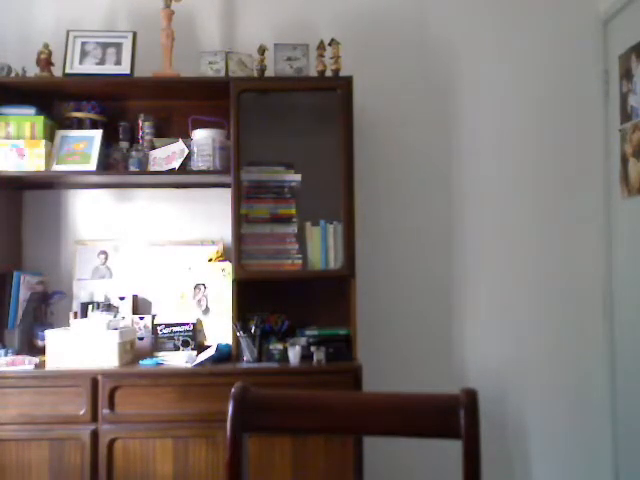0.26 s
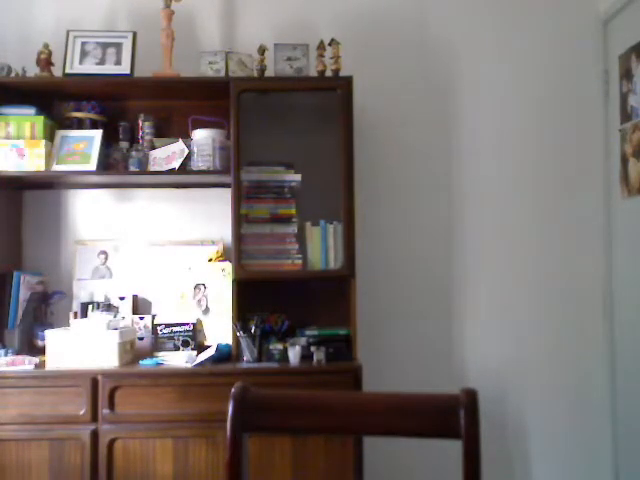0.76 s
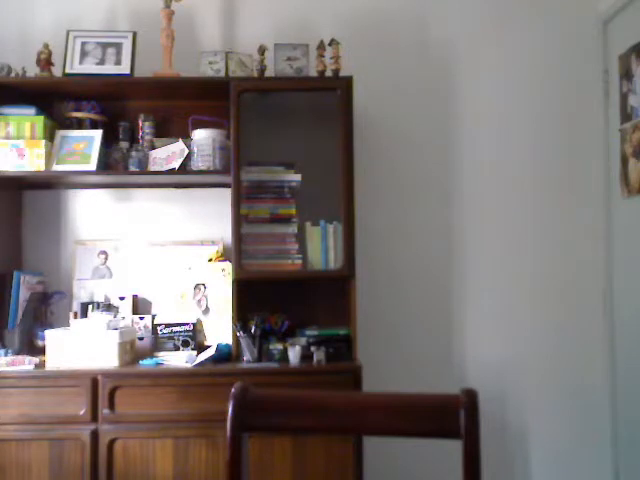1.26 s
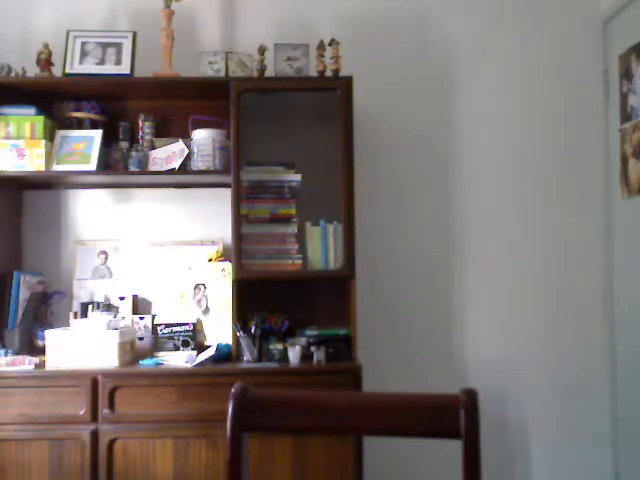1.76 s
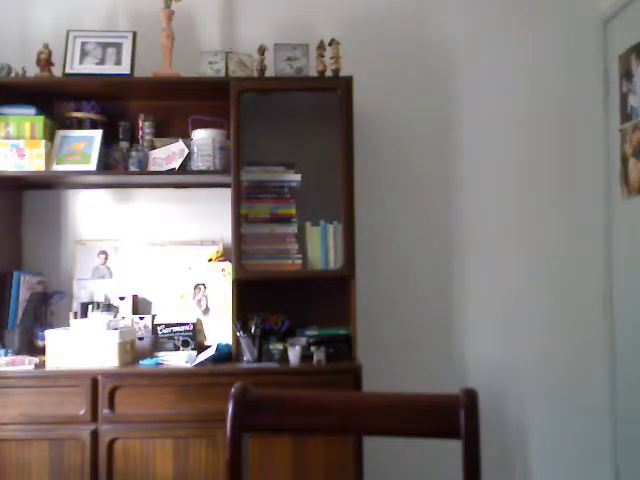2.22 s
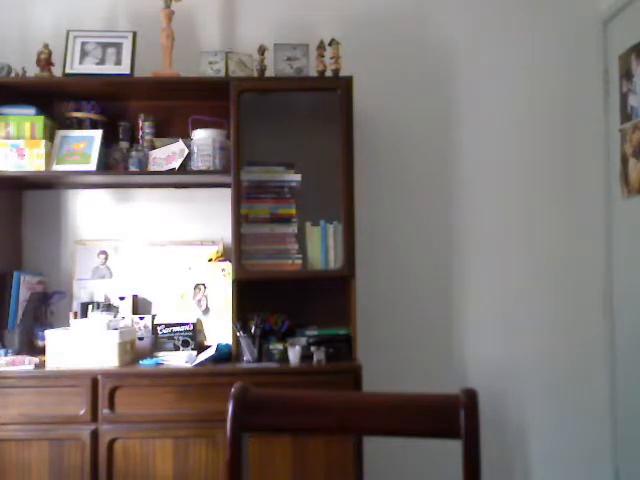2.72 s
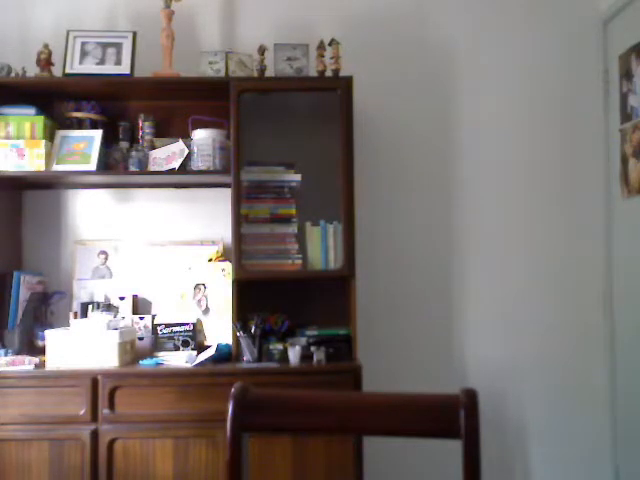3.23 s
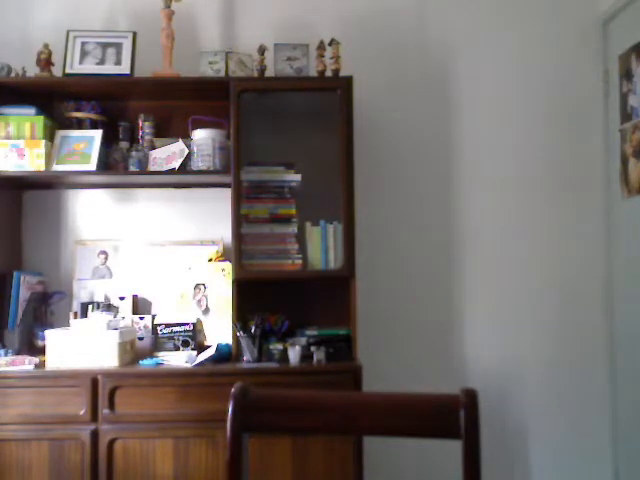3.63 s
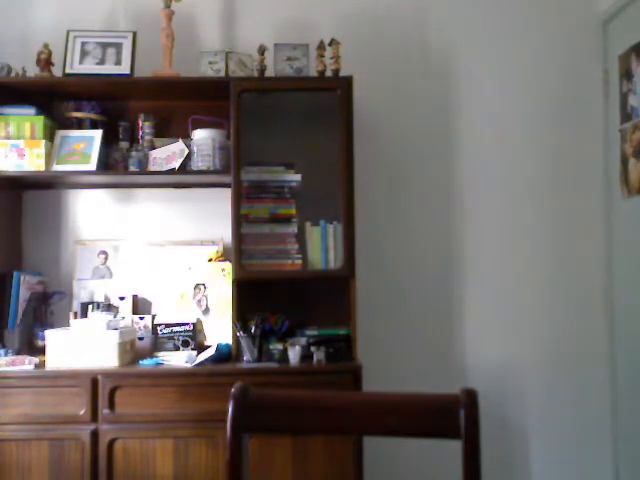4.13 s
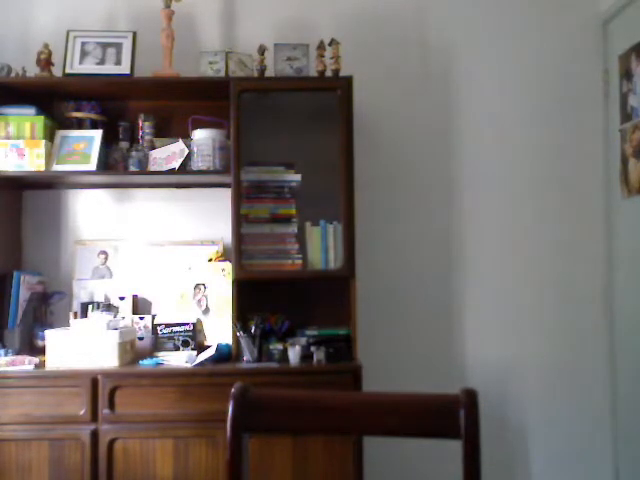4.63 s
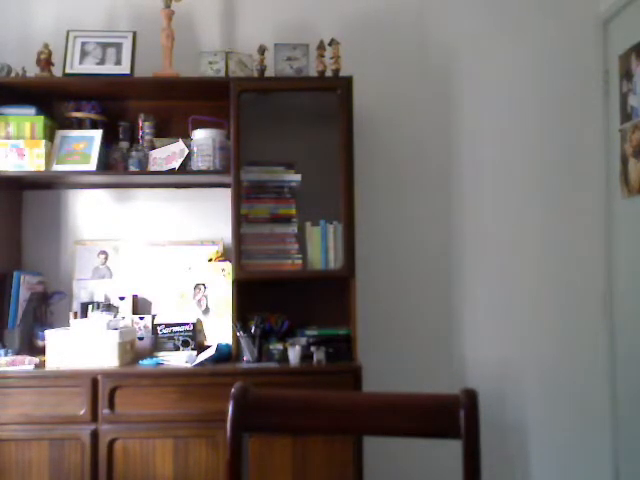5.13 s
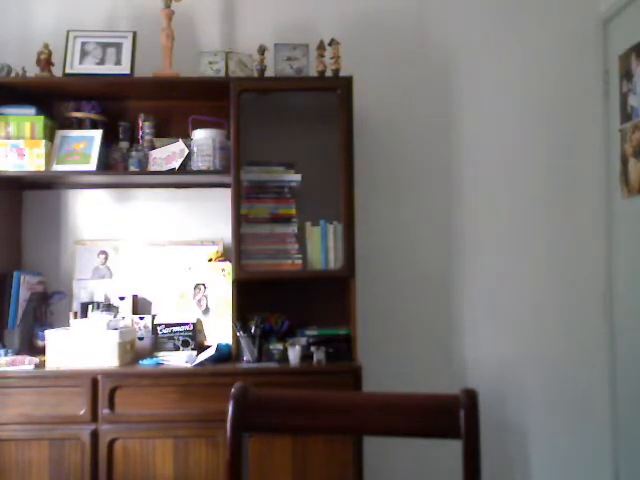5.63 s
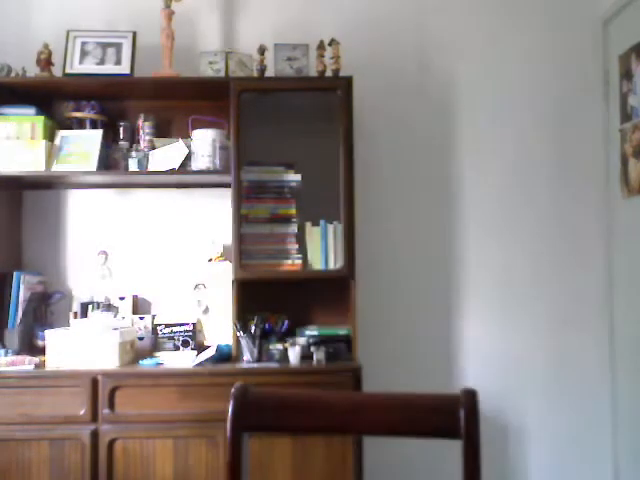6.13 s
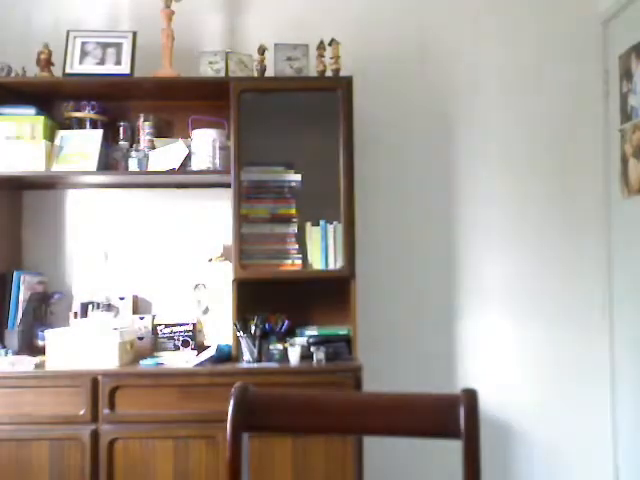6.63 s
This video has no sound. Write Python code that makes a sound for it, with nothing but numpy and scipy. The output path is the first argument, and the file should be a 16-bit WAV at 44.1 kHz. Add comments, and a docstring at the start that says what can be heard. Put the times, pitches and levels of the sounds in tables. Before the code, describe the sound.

Brief curtain-ring scrapes and clacks over a faint wavering hum, a woody rail knock, then crowded louder pulls that rattle and settle.

```python
"""Curtains are drawn open in a small quiet room, where an appliance hum swells and fades throughout.
At first cloth swishes softly; near 1.2 s and 2.7 s short pulls scrape the rings along the rail and clack them.
Loose rings tinkle and padded thuds follow; at 4.6 s the rail jolts with a woody knock.
From 5.3 s the pulls crowd together, loudest after 5.8 s, and the last rings tinkle as the cloth settles.
Noise and impulses drive the resonances of rail, rings and cloth, and the walls smear those contacts."""
import sys
import numpy as np
from scipy import signal
from scipy.fft import rfft, irfft, next_fast_len
from scipy.io import wavfile
from scipy.ndimage import uniform_filter1d, map_coordinates

SR = 44100
rng = np.random.default_rng(int(sys.argv[2]) if len(sys.argv) > 2 else 0)


def output_pcm(signal):
    """Save a mono or channel-first signal as 16-bit PCM at the path in sys.argv[1].

    Samples are clipped to [-1, 1] before scaling.
    """
    pcm = np.clip(np.atleast_2d(signal).T, -1, 1) * 32767
    wavfile.write(sys.argv[1], SR, np.round(pcm).astype(np.int16))


N = 302784
SIZE = 32768  # samples in the working window of one event
# until the weight bears on the rail (a time constant): less boom, more clack, less treble
LOAD_S, SLACK_BOOM_DB, SLACK_CLACK_DB, SLACK_TREBLE_DB = 0.011, -10.5, 0.5, -3.5


def amp(db):
    """Decibels to gain."""
    return 10 ** (np.asarray(db) / 20)


def unit(x):
    """Scale to rms 1."""
    return x / np.sqrt(np.mean(x ** 2) + 1e-20)


def along(points, hz):
    """(Hz, value) points read on a log frequency axis."""
    f, v = np.transpose(points)
    return np.interp(np.log(hz + 1), np.log(f), v)


def bell(hz, centre, width):
    """Resonance curve: 1 at its centre, one half at half a width to either side."""
    return 1 / (1 + (2 * (hz - centre) / width) ** 2)


def modes(hz, table):
    """Response of a set of (Hz, width, dB) modes, summed in power."""
    return np.sqrt(sum((amp(db) * bell(hz, f, w)) ** 2 for f, w, db in table))


def add(track, s, sound):
    """Mix a sound into the track at time s."""
    start = max(round(s * SR), 0)
    track[start:start + len(sound)] += sound[:N - start]


def axes():
    """Time and frequency axes of one event."""
    return np.arange(SIZE) / SR, np.fft.rfftfreq(SIZE, 1 / SR)


def wobble(t, rate):
    """A smooth random curve, rate knots a second."""
    return map_coordinates(rng.standard_normal(SIZE), [t * rate])


def room():
    """Diffuse answer of the room from one spot: a short build-up, then a decay, even in colour."""
    # how long the walls hold each band: (f/Hz, t60/s)
    decay_times = [(150, 0.34), (400, 0.23), (1000, 0.14), (2800, 0.16), (7000, 0.17), (15000, 0.22)]
    hz, t, z = signal.stft(rng.standard_normal(SIZE), SR, nperseg=256)
    decay = amp(-60 * t / along(decay_times, hz)[:, None])
    tail = signal.istft(z * decay, SR, nperseg=256)[1][:SIZE]
    build_up = 1 - np.exp(-np.arange(SIZE) / SR / 0.0006)
    tail = unit(tail * build_up) / np.sqrt(SIZE)
    tail[0] += 0.3  # the direct path to the microphone
    response = rfft(tail)
    colour = np.sqrt(np.abs(uniform_filter1d(np.abs(response) ** 2, size=101)))
    return response / colour


def heard(force, gain):
    """A force rings a body of the given frequency response, which sounds into the room."""
    # folding the cepstrum gives minimum phase: the body answers only after the blow
    cepstrum = irfft(np.log(np.maximum(unit(gain), 1e-6)))
    cepstrum[1:SIZE // 2] *= 2
    cepstrum[SIZE // 2 + 1:] = 0
    body = np.exp(rfft(cepstrum))
    return irfft(rfft(force) * body * room())[:SIZE * 3 // 4]


def contacts(envelope, rate, rub, seconds):
    """Tiny random impacts over smooth rubbing, with the energy of so many seconds at rms 1."""
    slips = (rng.random(SIZE) < rate / SR) * rng.standard_normal(SIZE)
    force = envelope * (unit(slips) + rub * rng.standard_normal(SIZE))
    return unit(force) * np.sqrt(seconds * SR / SIZE)


def background():
    """An appliance hums with a wandering level over faint steady tones and the noise of the room."""
    # course of the hum at the microphone: (t/s, level/dB)
    hum_levels = [(0.0, -64.5), (0.27, -70.5), (0.43, -60.5), (0.61, -72), (1.07, -59.5), (1.54, -75),
                  (1.79, -68.5), (2.16, -64.5), (2.35, -71), (2.57, -67), (3.53, -68.5), (3.73, -72.3),
                  (4.27, -62.5), (4.72, -75), (4.8, -68), (5.29, -63.5), (6.69, -62), (6.86, -64.5)]
    # steady tones: (f/Hz, level/dB)
    whine_tones = [(48, -93), (100, -89), (237, -82), (1281, -81), (7316, -107), (8000, -104)]
    # colour of the room noise: (f/Hz, relative level/dB per Hz)
    air_colour = [(25, -44), (45, -23), (110, -20), (140, -9.5), (235, -8.5), (380, -19.5), (760, -18.5),
                  (1050, -20.5), (1300, -19), (1500, -23), (4200, -33.5), (6000, -37), (7500, -50),
                  (15000, -48)]
    t = np.arange(N) / SR

    def tone(hz, drift):
        """A sine of rms 1 whose pitch wanders by about drift Hz."""
        pitch_hz = hz + drift * wobble(t, 4.7)
        return np.sqrt(2) * np.sin(2 * np.pi * np.cumsum(pitch_hz) / SR)

    hum_db = np.interp(t, *np.transpose(hum_levels)) + 0.7 * wobble(t, 8)
    hum = amp(hum_db) * tone(143.7, drift=0.96)
    whine = sum(amp(db) * tone(hz, drift=min(0.006 * hz, 8)) for hz, db in whine_tones)
    air_gain = amp(along(air_colour, np.fft.rfftfreq(N, 1 / SR)))
    air = unit(irfft(rfft(rng.standard_normal(N)) * air_gain, N))
    return hum + whine + amp(-67.5) * air


def stirs():
    """The hanging cloth stirs faintly at random: rows with the same columns as the swishes."""
    per_s, length_s, mean_db, middle_hz = 1.0, 0.019, -77.5, 5130
    rows = []
    for when, force, fold in rng.random((round(per_s * N / SR), 3)):
        level_db = mean_db + 6 * (force - 0.5)
        centre_hz = middle_hz * 1.04 ** (fold - 0.5)
        rows.append((when * N / SR, length_s, level_db, centre_hz))
    return rows


def swishes():
    """Folds of cloth brush past each other with a soft narrow hiss."""
    # strokes of the cloth: (t/s, length/s, level/dB, centre f/Hz)
    strokes = [(0.006, 0.028, -70, 4500), (0.462, 0.044, -74.5, 4830), (0.771, 0.0071, -63, 4900),
               (0.986, 0.03, -57.5, 4370), (1.146, 0.015, -49.5, 4000), (2.054, 0.008, -63.5, 3100),
               (2.37, 0.019, -65, 3200), (3.253, 0.012, -69, 3700), (4.032, 0.074, -71.5, 5100),
               (6.053, 0.053, -65, 5130), (6.359, 0.028, -46.5, 5370), (6.547, 0.075, -59, 4930),
               (6.705, 0.044, -63.5, 5200)]
    track, (t, hz) = np.zeros(N), axes()
    for s, length, db, centre_hz in strokes + stirs():
        stroke = np.sqrt(np.abs(np.sin(np.pi * np.minimum(t / length, 1))))
        cloth = bell(hz, centre_hz, 0.7 * centre_hz) / (1 + (hz / 6800) ** 14)
        brushing = contacts(stroke, rate=3600, rub=1.0, seconds=length)
        add(track, s, amp(db) * heard(brushing, cloth))
    return track


def bumps():
    """Cushioned knocks of the rail and its fittings excite only a low band."""
    # soft knocks: (t/s, level/dB, f/Hz)
    knocks = [(0.769, -55.5, 560), (0.802, -55.5, 281), (1.63, -40, 750), (2.823, -39, 700),
              (3.54, -56, 284), (3.693, -65.5, 950), (3.694, -63, 302), (4.66, -52.5, 602),
              (4.932, -60.5, 265), (5.342, -48, 250), (5.851, -39.5, 230), (6.196, -38, 137)]
    track, (t, hz) = np.zeros(N), axes()
    blow = np.sqrt(0.03 * SR) * (t == 0)  # the energy of 30 ms at rms 1
    for s, db, pitch_hz in knocks:
        add(track, s, amp(db) * heard(blow, bell(hz, pitch_hz, 0.65 * pitch_hz) ** 3))
    return track


def rail(hz, boom_db, clack_db, treble_db, slack=0):
    """Heavy contact wakes the rail's low modes, a free ring clacks, a hard contact is bright."""
    # broad colour of rings on the rail: (f/Hz, relative level/dB per Hz)
    rail_colour = [(40, -44.5), (100, -14.5), (220, -9), (420, 1), (700, 2.5), (1150, 2.5), (1450, 0.5),
                   (2200, -1.5), (3800, -1.5), (5900, -6.5), (6700, -17), (7600, -27.5), (11000, -35),
                   (15000, -41)]
    # their resonances, as peaks or dips in that colour: (f/Hz, width/Hz, level/dB)
    resonances = [(217.7, 54, 13.5), (309.6, 96, 11), (387.6, 44, -14), (568, 160, 3), (888, 30, 1.5),
                  (1203, 91, -7.5), (1593, 220, 5), (1970, 35, 2), (2856, 130, 5.5), (3440, 82, 0.5),
                  (4300, 230, -1.5), (13200, 1800, 3)]
    boom_db = boom_db + SLACK_BOOM_DB * slack
    clack_db = clack_db + SLACK_CLACK_DB * slack
    treble_db = treble_db + SLACK_TREBLE_DB * slack
    detune = 1 + 0.026 * rng.standard_normal(len(resonances))  # no two contacts ring quite alike
    peaks_db = sum(db * bell(hz, f * d, w) for (f, w, db), d in zip(resonances, detune))
    low = 1 / (1 + (hz / 1020) ** 8)
    high = 1 - 1 / (1 + (hz / 2900) ** 4)
    contact_db = boom_db * low + clack_db * bell(hz, 1680, 750) + treble_db * high
    return amp(along(rail_colour, hz) + peaks_db + contact_db)


def clack(spread, gain):
    """Several rings hit each other within a few milliseconds."""
    t, hz = axes()
    burst = np.exp(-t / spread) - np.exp(-5 * t / spread)
    return heard(contacts(burst, rate=1100, rub=0.24, seconds=0.02), gain)


def drag(push, span, boom_db, clack_db, treble_db, fizz_db, count):
    """Rings chatter past count spots of the rail in small slips; rubbing adds a fine fizz on top."""
    sound, (t, hz) = 0, axes()
    fizz = amp(fizz_db * hz ** 8 / (hz ** 8 + 10000.0 ** 8))
    for at in np.arange(count) * span / count:
        # neighbouring spots crossfade at constant power
        part = push * np.sqrt(np.clip(1 - np.abs(t - at) * count / span, 0, 1))
        body = rail(hz, boom_db, clack_db, treble_db, slack=np.exp(-at / LOAD_S))
        chatter = contacts(part, rate=640, rub=0.28, seconds=np.sum(part ** 2) / SR)
        sound = sound + heard(chatter, fizz * body)
    return sound


def pulls():
    """Each pull jerks the slack rings, drags them unevenly along the rail and lets them run out."""
    # pulls on the curtain: (t/s, length/s, level at the end of the pull/dB, swell over the pull/dB,
    # run-out t60/s, rail boom/dB, ring clack/dB, treble/dB, rubbing fizz/dB)
    pull_rows = [(1.147, 0.01, -51.5, -1, 0.067, -16, 19, -5, 0),
                 (1.257, 0.058, -45, -1.5, 0.099, 8.5, 15.5, 17, 3),
                 (2.695, 0.11, -40, 0, 0.09, -6, 7.5, 6, 1),
                 (2.812, .105, -36, -0.5, .07, 1.5, 5.5, 8.5, 10),
                 (5.311, 0.019, -37.5, 5.5, 0.103, 7, 8, 13, 0),
                 (5.44, 0.017, -39, 1.5, 0.18, 8, 7, 12.5, 1),
                 (5.586, 0.012, -30, 4, 0.14, 5.5, -3, 4, -0.5),
                 (5.78, 0.06, -27, 0.5, 0.052, -2.5, -0.5, -0.5, 7),
                 (5.835, 0.032, -19, 1.5, 0.24, -1, 1.5, 1, 4.5),
                 (6.095, 0.031, -30, -1.5, 0.055, -5, -2.5, -8, 1),
                 (6.138, 0.15, -23, -0.5, 0.22, -4, 2, 3, 5)]
    attack_s, surge_db, surges_per_s = 0.0018, 2, 74.5
    jerk_db, jerk_spread_s = -3, 0.0043  # clack of the slack rings, against the pull's first level
    track, (t, hz) = np.zeros(N), axes()
    for s, length, db, swell_db, run_out, boom_db, clack_db, treble_db, fizz_db in pull_rows:
        swell = swell_db * np.minimum(t / length - 1, 0)
        fall = 60 * np.maximum(t - length, 0) / run_out
        surge = surge_db * wobble(t, surges_per_s)
        push = amp(swell - fall + surge) * (1 - np.exp(-t / attack_s))
        span = length + 0.74 * run_out
        add(track, s, amp(db) * drag(push, span, boom_db, clack_db, treble_db, fizz_db, count=9))
        slack_rings = rail(hz, boom_db, clack_db, treble_db, slack=1)
        add(track, s, amp(db - swell_db + jerk_db) * clack(jerk_spread_s, slack_rings))
    return track


def clacks():
    """Moving rings run into the ones ahead."""
    # collisions: (t/s, level/dB, spread/s, rail boom/dB, treble/dB)
    collisions = [(1.307, -33, 0.006, -13, -10), (1.613, -29.5, 0.0094, -2.5, 6.5),
                  (1.622, -35, 0.021, -0.5, 10), (2.81, -25, 0.0062, -8.5, 1.5),
                  (2.896, -44.5, 0.006, 6, 19.5), (6.126, -26, 0.003, -10.5, -4.5),
                  (6.14, -23, 0.0023, -9, -2.5), (6.239, -21, 0.012, -0.5, 4), (6.286, -27, .003, 0, 7),
                  (6.565, -53, 0.0031, -17, 18)]
    track, (t, hz) = np.zeros(N), axes()
    for s, db, spread, boom_db, treble_db in collisions:
        rings = rail(hz, boom_db, clack_db=0.5, treble_db=treble_db)
        add(track, s, amp(db) * clack(spread, rings))
    return track


def tinks():
    """Single loose rings settle and ring briefly, each at a slightly different pitch."""
    # tinkles: (t/s, level/dB)
    taps = [(1.751, -51), (3.264, -61), (3.40, -66), (3.523, -63.5), (3.609, -59.5), (6.785, -62.5)]
    # modes of one ring alone: (f/Hz, width/Hz, relative level/dB)
    ring_modes = [(2645, 170, 9), (3100, 1800, -12), (4000, 1100, -30), (5800, 640, -17.5)]
    track, (t, hz) = np.zeros(N), axes()
    tap = np.sqrt(0.013 * SR) * (t == 0)  # the energy of 13 ms at rms 1
    for s, db in taps:
        detune = 1 + 0.0048 * rng.standard_normal()
        ring = modes(hz * detune, ring_modes) + amp(-37) * bell(hz, 2700, 2500)
        add(track, s, amp(db) * heard(tap, ring))
    return track


def thuds():
    """A padded blow gives a few low cycles and nothing else, added dry."""
    # dull low thuds: (t/s, level/dB, f/Hz)
    blows = [(1.775, -54.5, 92), (6.432, -46.5, 129)]
    track, (t, hz) = np.zeros(N), axes()
    swell = t / 0.0073 * np.exp(1 - t / 0.0082)
    for s, db, pitch_hz in blows:
        add(track, s, amp(db) * swell * np.sin(2 * np.pi * pitch_hz * t))
    return track


def jolts():
    """The whole rail jolts in its brackets, with a hollow woody ring and no deep bass."""
    # jolts close together: (t/s, level/dB, spread/s)
    jolt_rows = [(4.587, -34, 0.0083), (4.596, -33.5, 0.011)]
    # modes of the rail in its brackets: (f/Hz, width/Hz, relative level/dB)
    bracket_modes = [(340, 170, 1), (500, 170, 2), (692, 76, 6), (860, 127, 4), (1220, 340, -7),
                     (1910, 1100, -16.5), (2560, 530, -3.5), (3200, 1200, -11.5), (4160, 810, -13),
                     (5600, 1160, -21)]
    track, (t, hz) = np.zeros(N), axes()
    body = (modes(hz, bracket_modes) + amp(-53.5)) * hz ** 2 / (hz ** 2 + 150 ** 2)
    for s, db, spread in jolt_rows:
        burst = np.exp(-t / spread) - np.exp(-6 * t / spread)
        force = contacts(burst, rate=980, rub=0.31, seconds=0.024)
        add(track, s, amp(db) * heard(force, body))
    return track


def scene():
    """The curtain and the room around it, on one channel."""
    cloth_and_room = background() + swishes()
    rings = pulls() + clacks() + tinks()
    knocks = bumps() + thuds() + jolts()
    return (cloth_and_room + rings + knocks)[None]


def record(dry):
    """The microphone passes nothing above its band limit."""
    top_hz = 15250
    size = next_fast_len(N + SR // 2)
    passed = np.fft.rfftfreq(size, 1 / SR) < top_hz
    return irfft(rfft(dry, size) * passed, size)[:, :N]


dry = scene()
out = record(dry)
output_pcm(out)
```